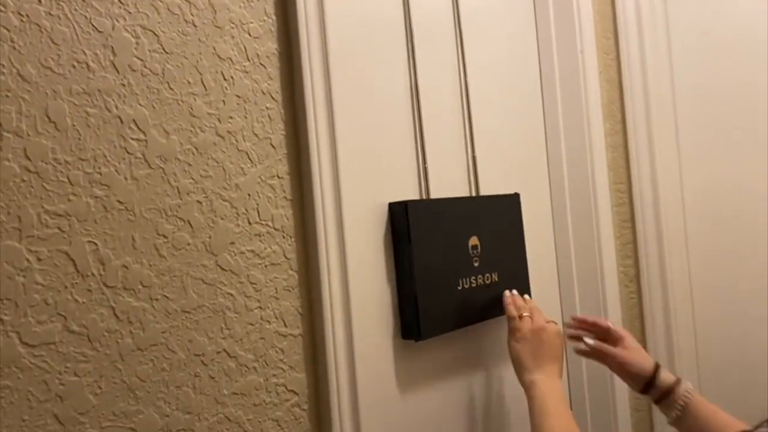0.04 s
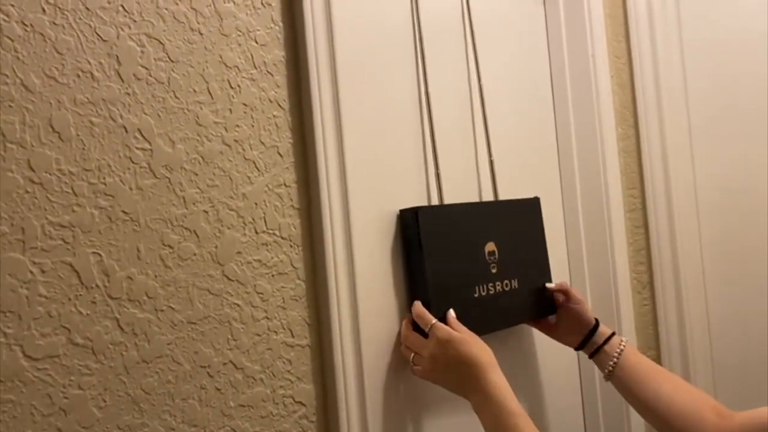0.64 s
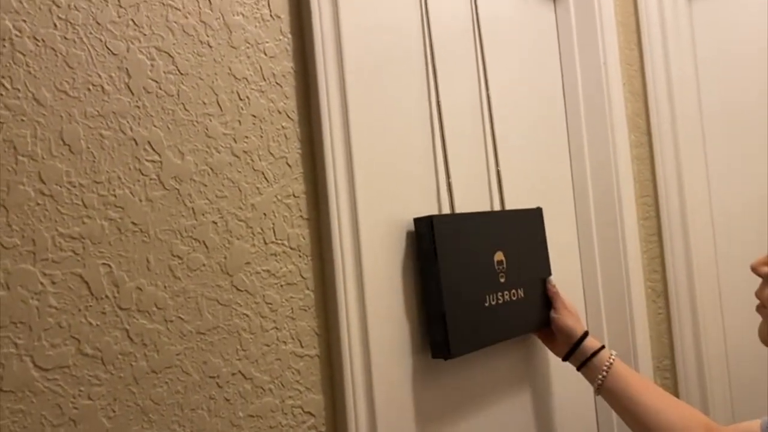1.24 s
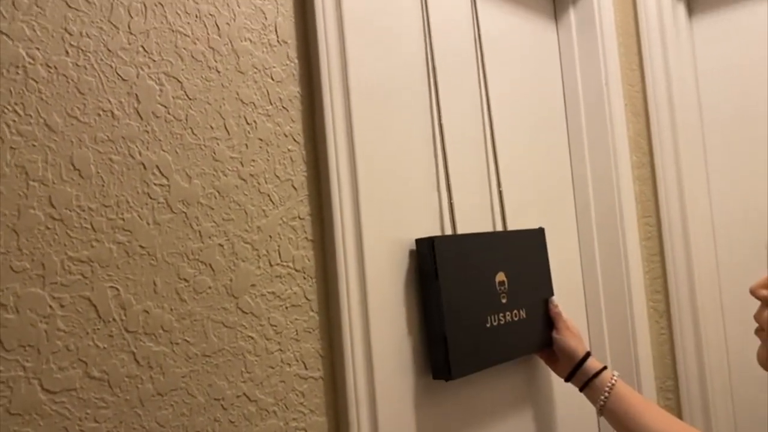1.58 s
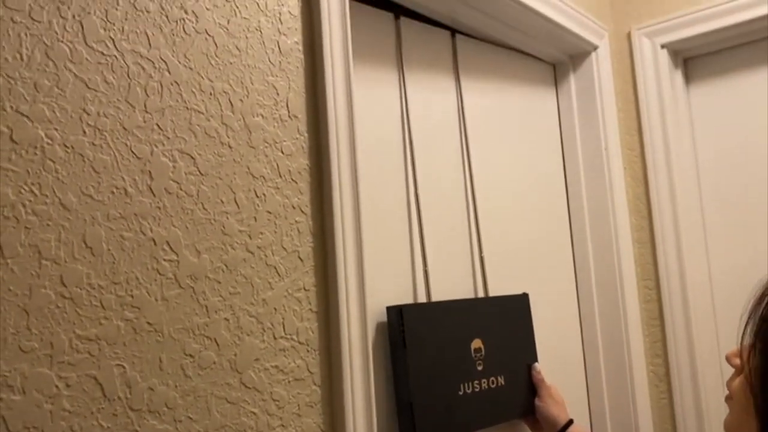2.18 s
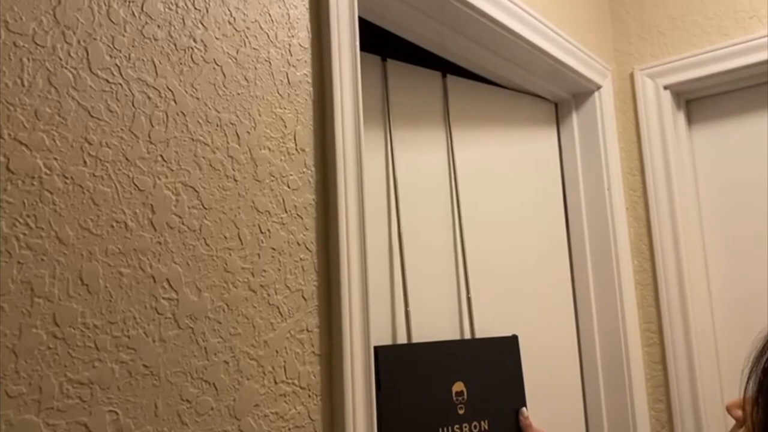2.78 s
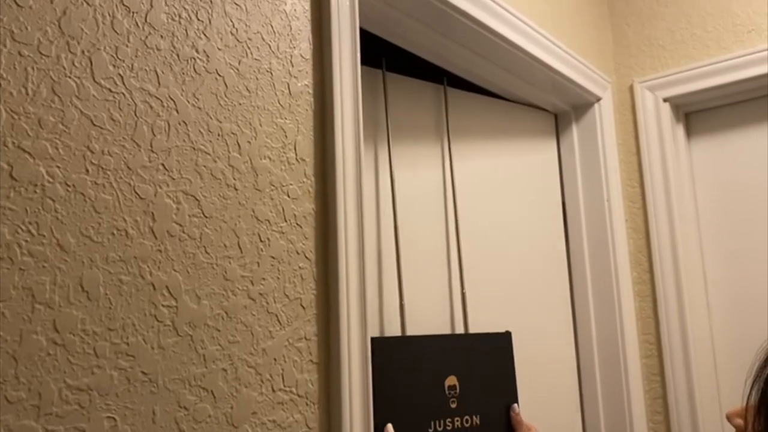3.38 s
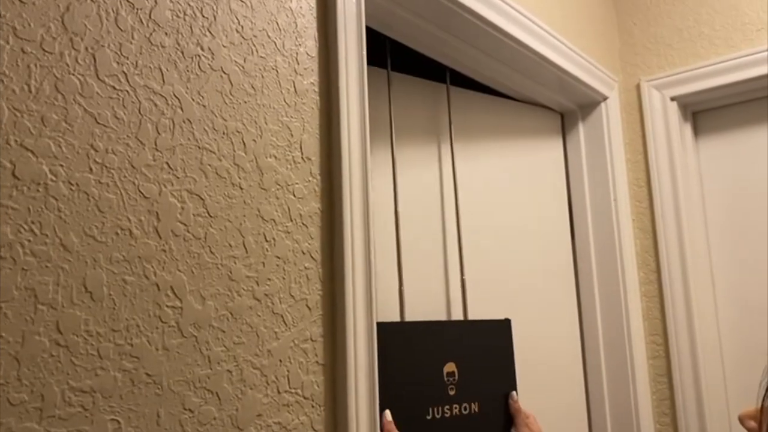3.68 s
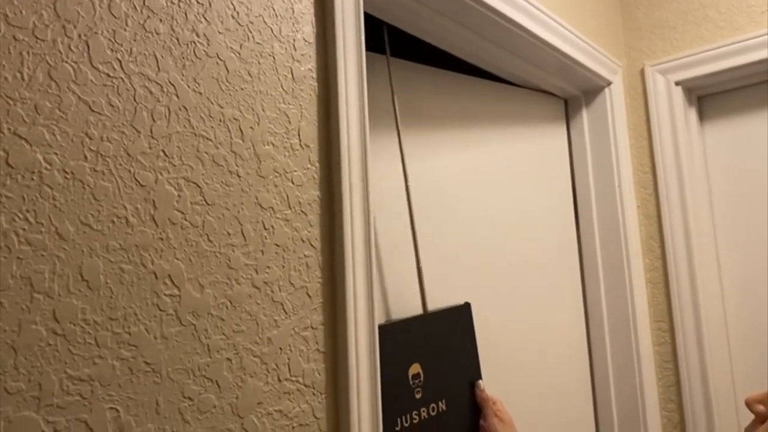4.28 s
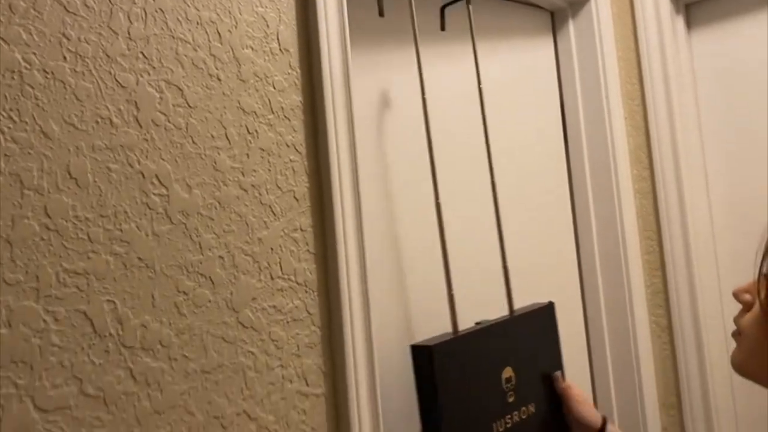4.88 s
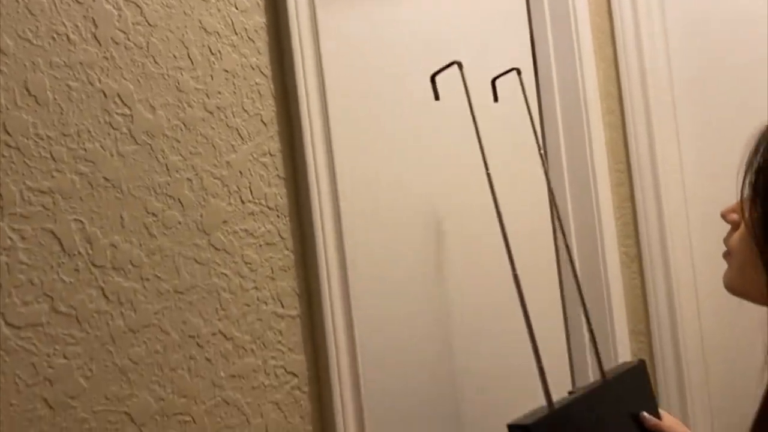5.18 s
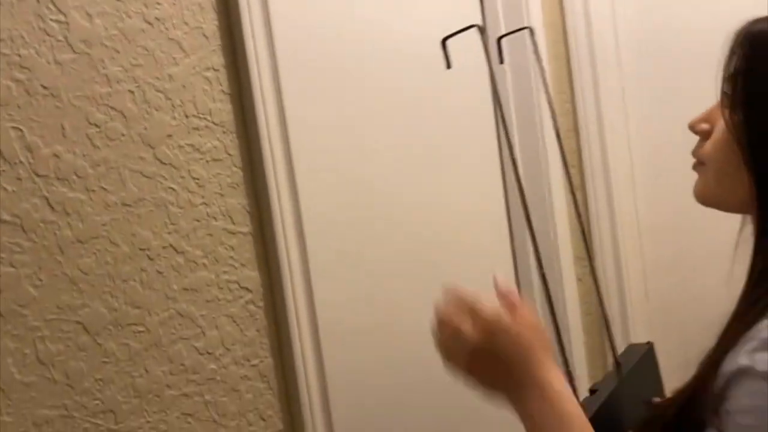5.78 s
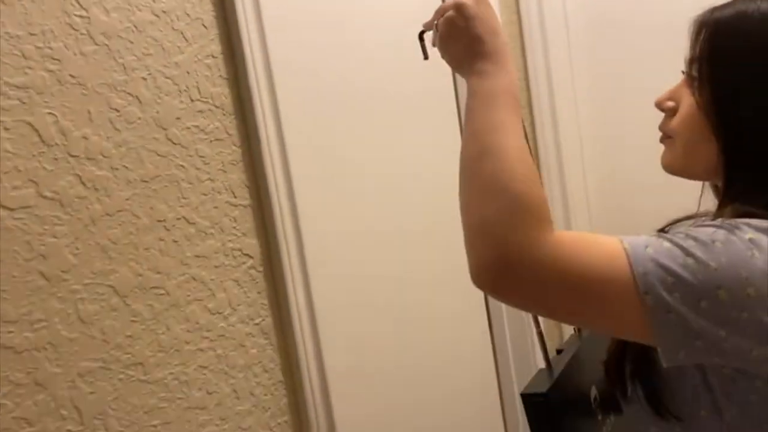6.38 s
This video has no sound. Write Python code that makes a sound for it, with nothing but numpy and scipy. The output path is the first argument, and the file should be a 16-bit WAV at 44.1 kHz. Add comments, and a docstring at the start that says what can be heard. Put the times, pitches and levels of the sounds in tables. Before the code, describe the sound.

A faint, low ventilation hum runs throughout in a narrow hallway with a short echo. From about 0.2 to 1.5 seconds, fingers and nails tap lightly on a folded mirror case, which chafes briefly against a door. At 1.6 seconds the door meets its latch with a deep thud and a crack, the loudest sound, and wire hooks buzz briefly. From 2.6 seconds the hooks clack against the wood, with low knocks, gritty scraping and two short groans around 3.2 and 3.4 seconds. The strongest rattles come at 3.6 and 4.2 seconds, each with a short metallic twang slightly to the left, and a smaller clack follows at 4.5. Around 5 seconds the wire skids with a thin hiss, then one dry click. The hollow case bumps softly several times until 6 seconds. A sleeve rustle grows toward 6.5 seconds, with two light taps.

```python
"""In a narrow hallway, a folded mirror hangs from a door by two long wire hooks.
Fingers tap its case, the door meets its latch with a thud, the hooks scrape and clack off its top edge,
and the mirror is carried away with soft bumps and a rustle. Ventilation hums faintly throughout.
Impacts excite damped modes of wood and wire and bursts of reverberant noise; sliding friction
gives sustained noise, coloured by the surfaces in contact."""
import sys
import numpy as np
from scipy import signal
from scipy.fft import rfft, irfft, next_fast_len
from scipy.io import wavfile
from scipy.ndimage import uniform_filter1d, map_coordinates

SR = 44100
rng = np.random.default_rng(int(sys.argv[2]) if len(sys.argv) > 2 else 0)


def digitize_waveform(pressure):
    """Quantize a signal to 16-bit integers and store it at the path in sys.argv[1].

    Rows of a 2-D input are taken as channels; values are limited to [-1, 1].
    """
    field = np.atleast_2d(pressure).T
    bounded = np.clip(field, -1, 1)
    quanta = np.round(bounded * 32767).astype(np.int16)
    wavfile.write(sys.argv[1], SR, quanta)


N = 292904
TIME_S, RING_S = np.arange(N) / SR, np.arange(SR // 2) / SR  # time axes of the scene and of one blow
LEAD_S = 0.03  # surfaces graze this long before they meet

def amp(db):
    """Amplitude ratio: tenfold for every 20 dB."""
    return 10 ** (np.asarray(db) / 20)

def unit(x):
    """Normalisation to rms 1."""
    return x / np.sqrt(np.mean(x ** 2) + 1e-20)

def along(points, hz):
    """Interpolation of (frequency_hz, value) points on a logarithmic frequency axis."""
    knots_hz, values = np.transpose(points)
    return np.interp(np.log(hz + 1), np.log(knots_hz + 1), values)

def wobble(rate_hz):
    """Slow random modulation: a spline through rate_hz knots a second."""
    knots = rng.standard_normal(int(N * rate_hz / SR) + 4)
    return map_coordinates(knots, [TIME_S * rate_hz])

def filtered(x, response):
    """Linear filtering: the spectrum is multiplied by a frequency response."""
    n = x.shape[-1]
    padded = next_fast_len(n + 8192)
    return irfft(rfft(x, padded) * response(np.fft.rfftfreq(padded, 1 / SR)), padded)[..., :n]

def add(track, start_s, sound):
    """Superposition: a sound sums into the track from start_s on."""
    part = track[..., round(start_s * SR):][..., :sound.shape[-1]]
    part += sound[..., :part.shape[-1]]

# Likeness of left and right: frequency_hz, coherence_ratio
COHERENCE = [(60, 0.91), (150, 0.81), (280, 0.75), (500, 0.62), (900, 0.13), (2000, 0.13), (4000, 0.48),
             (10000, 0.28)]
def diffuse(pair):
    """Diffuse field: two independent signals mix into partly coherent left and right channels."""
    angle = lambda hz: np.arccos(np.clip(along(COHERENCE, hz), -1, 1)) / 2
    mid, side = filtered(pair, lambda hz: np.array([np.cos(angle(hz)), np.sin(angle(hz))]))
    return np.array([mid + side, mid - side])

def rush(spectrum, grain_db):
    """Amplitude modulation makes noise grainy; (frequency_hz, level_db) points colour it. Rms is 1."""
    grains = rng.standard_normal((2, N)) * amp(grain_db * wobble(250))
    return unit(filtered(diffuse(grains), lambda hz: amp(along(spectrum, hz))))

def resonances(peaks, hz):
    """Resonance: each peak adds a Lorentzian curve to the frequency response."""
    return sum(amp(db) / (1 + (2 * (hz - centre_hz) / width_hz) ** 2) for centre_hz, width_hz, db in peaks)

def crowded_modes(hz, spacing_hz, depth_db):
    """Modal selection: each contact point favours a few of many short-lived resonances."""
    ripple = map_coordinates(rng.standard_normal(512), [hz / spacing_hz], mode="mirror")
    return amp(depth_db * np.minimum(ripple, 1))  # damping caps the peaks; the gaps stay deep

def ring(modes, scatter_db):
    """Free vibration: modes decay exponentially, with random phase and level scatter at each ear."""
    hz, db, t60_s = np.transpose(modes)[:, :, None]
    strength = amp(rng.normal(0, scatter_db, (2, len(modes))))
    phase = rng.uniform(0, 2 * np.pi, strength.shape)
    fade = amp(db - 60 * RING_S / t60_s) * (1 - np.exp(-RING_S / 0.0041))
    angle = 2 * np.pi * hz * RING_S
    sines, cosines = fade * np.sin(angle), fade * np.cos(angle)
    return (strength * np.cos(phase)) @ sines + (strength * np.sin(phase)) @ cosines

# Reverberation time of the hallway: frequency_hz, t60_s
HALL_DECAY = [(200, 0.42), (800, 0.32), (2500, 0.25), (6000, 0.21), (11000, 0.066)]
def impact(rise_s, early_t60_s, tail_db):
    """Reverberation: close walls thicken a blow into a noise burst; its tail dies treble first."""
    hz, frame_s, spectra = signal.stft(rng.standard_normal((2, len(RING_S))), SR, nperseg=256)
    decay = amp(-60 * np.maximum(frame_s - LEAD_S, 0) / along(HALL_DECAY, hz)[:, None])
    tail = signal.istft(spectra * decay, SR, nperseg=256)[1][:, :len(RING_S)]
    age_s = RING_S - LEAD_S - rise_s
    onset = 1 + np.tanh(age_s / max(rise_s, 0.0005) / 2)
    early = rng.laplace(size=tail.shape) * amp(-60 * np.maximum(age_s, 0) / early_t60_s)
    return onset * (early + amp(tail_db) * tail)

def softness_db(hz, hardness_hz):
    """Contact compliance: a blow excites little above its hardness frequency."""
    return -10 * np.log10(1 + (hz / hardness_hz) ** 4)

def strike(blow, spectrum, weight_db, hardness_hz, knock_db, ripple_db):
    """Impact spectrum: weight sets the thump and knock, hardness the tick, relative to the bright band."""
    colour = lambda hz: amp(along(spectrum, hz)) * crowded_modes(hz, spacing_hz=69.36, depth_db=ripple_db)
    sound = filtered(diffuse(blow), colour)
    bands = [(220, 600, weight_db),  # thump
             (600, 1300, knock_db + 0.93 * weight_db),  # knock
             (1300, 3500, 0),  # bright band
             (3500, 13000, softness_db(5930, hardness_hz))]  # tick
    out = 0
    for low_hz, high_hz, db in bands:
        band = filtered(sound, lambda hz: 1 / (1 + (hz / high_hz) ** 8) - 1 / (1 + (hz / low_hz) ** 8))
        power = uniform_filter1d(np.mean(band ** 2, axis=0), size=768)
        out = out + amp(db) * band / np.sqrt(power.max())
    return out

def held(strokes, attack_s, release_t60_s):
    """Incoherent addition: stroke envelopes build, hold and decay, and their powers sum."""
    power = np.zeros(N)
    for start_s, length_s, db in strokes:
        t = np.arange(int((length_s + release_t60_s) * SR)) / SR
        build_s = attack_s + 0.063 * length_s  # long strokes build more slowly
        attack = np.sin(np.pi / 2 * np.minimum(t / build_s, 1)) ** 2
        level = amp(db - 60 * np.maximum(t - length_s, 0) / release_t60_s)
        add(power, start_s, (attack * level) ** 2)
    return np.sqrt(power)

# Moving air: frequency_hz, level_db
AIR_SPECTRUM = [(20, -29), (38, -1), (60, -1), (88, -12.5), (125, 2), (160, -14), (240, -16), (400, -25),
                (660, -37.5), (1200, -45.5), (3000, -57.5), (11900, -67.5)]
# Ventilation resonances: pitch_hz, width_hz, level_db
VENT_HUMS = [(52.04, 6.1, -53), (123.1, 9, -59), (226.6, 21, -69)]
def ventilation(air_db):
    """Narrow-band noise: resonances waver as hums over a dull rush of air; both swell once."""
    hum = np.zeros(N)
    for hz, width_hz, db in VENT_HUMS:
        phase = 2 * np.pi * hz * TIME_S
        hum += amp(db) * (wobble(2 * width_hz) * np.cos(phase) + wobble(2 * width_hz) * np.sin(phase))
    swell_db, crest_s, half_width_s = 2.5, 6.27, 0.74
    swell = amp(swell_db * np.exp(-((TIME_S - crest_s) / half_width_s) ** 2))
    return swell * (hum + amp(air_db) * rush(AIR_SPECTRUM, grain_db=1.5))

# Fingers and nails on the case: start_s, level_db, weight_db, hardness_hz
FINGER_TAPS = [(0.226, -57.5, 9, 3920), (0.287, -60.5, 4, 4200), (0.304, -61.5, 11.5, 3700),
               (0.336, -55, 0.5, 4700), (0.391, -62.5, 4, 4230), (0.46, -62, 3, 4700),
               (0.524, -73, 17.5, 3000), (0.617, -55, -18, 2860), (0.647, -50, -9, 3000),
               (0.701, -65.5, 9, 1490), (0.787, -74, 5, 3200), (0.875, -72.5, 5.5, 3000),
               (1.267, -60, -10, 6540), (1.426, -54, -4.5, 2420), (2.057, -73, -8, 1600),
               (2.47, -63.5, -2.5, 2500), (2.556, -64, 11.5, 2000), (6.165, -57, -5, 2680),
               (6.431, -52.5, -11, 5600)]
# The tapped case: frequency_hz, level_db
TAP_SPECTRUM = [(250, -4), (500, -9), (1000, -3), (1800, -10), (3000, -14.5), (5000, -8), (7500, -7.5),
                (11500, -13.5)]
def finger_taps(gain_db):
    """Impulsive excitation: light contacts on the case give short, dry taps."""
    out = np.zeros((2, N))
    for start_s, db, weight_db, hardness_hz in FINGER_TAPS:
        blow = impact(rise_s=0.0039, early_t60_s=0.074, tail_db=-7)
        tap = strike(blow, TAP_SPECTRUM, weight_db, hardness_hz, knock_db=-5, ripple_db=5.5)
        add(out, start_s - LEAD_S, amp(db + gain_db) * tap)
    return out

# Blows that reach the wood: start_s, level_db
DOOR_KNOCKS = [(0.228, -47), (0.304, -54), (0.335, -46.5), (1.572, -28), (3.137, -41), (3.178, -42),
               (3.54, -42), (3.586, -38), (4.094, -48), (4.267, -45), (4.541, -43.5), (4.568, -49)]
# Upper modes of the door: pitch_hz, level_db, t60_s
KNOCK_MODES = [(224.3, 0.5, 0.15), (362, -6, 0.14), (441, -4, 0.1), (507, -10, 0.1)]
def door_knocks(gain_db):
    """Damped resonance: the hollow door answers a firm blow with a short, low knock."""
    out = np.zeros((2, N))
    for start_s, db in DOOR_KNOCKS:
        add(out, start_s, amp(db + gain_db) * diffuse(ring(KNOCK_MODES, scatter_db=0)))
    return out

# Strokes of the sleeve and sliding fingers: start_s, length_s, level_db
SLEEVE_STROKES = [(0.27, 0.078, -77), (0.5, 0.074, -75), (2.29, 0.075, -74.5), (2.47, 0.039, -78.5),
                  (4.695, 0.018, -75.5), (4.78, 0.038, -74), (4.87, 0.043, -71), (4.93, 0.5, -75),
                  (5.45, 0.17, -75.5), (5.565, 0.028, -70.5), (5.63, 0.2, -78), (5.82, 0.56, -71.5),
                  (6.02, 0.11, -69), (6.17, 0.057, -69), (6.405, 0.063, -56.5), (6.49, 0.12, -62),
                  (6.54, 0.033, -58.5)]
# Sliding cloth: frequency_hz, level_db
CLOTH_SPECTRUM = [(150, -28), (400, -2), (1000, 3), (1400, -5.5), (2200, -5.5), (4500, -12), (7500, -12.5),
                  (11500, -18.5)]
def sleeve_rustle(gain_db):
    """Friction noise: cloth and skin slide in grainy strokes that flutter as folds catch."""
    flutter_db = 1.6 * wobble(28)
    envelope = held(SLEEVE_STROKES, attack_s=0.017, release_t60_s=0.31)
    return amp(gain_db + flutter_db) * envelope * rush(CLOTH_SPECTRUM, grain_db=1)

# The case rubs along the door: start_s, length_s, level_db
CASE_RUBS = [(0.55, 0.04, -67.5), (0.942, 0.019, -63.5), (0.989, 0.035, -58), (1.465, 0.12, -69)]
def case_rub():
    """Sliding friction: the case drags on the paint with a narrow, hollow chafe."""
    spectrum = [(400, -8), (800, -4), (1100, -0.5), (1650, -5), (2000, -13), (2700, -25),
                (4000, -40), (8000, -42)]
    return held(CASE_RUBS, attack_s=0.0085, release_t60_s=0.15) * rush(spectrum, grain_db=0)

# Jolts of the door panel: start_s, level_db
DOOR_THUDS = [(1.572, -15.5), (3.14, -36), (3.539, -32), (3.57, -36), (4.025, -40.5), (5.718, -37.5),
              (6.109, -39)]
# Lowest modes of the panel: pitch_hz, level_db, t60_s
PANEL_MODES = [(36, 7.5, 0.076), (65.4, 1.5, 0.13), (123, -1.5, 0.13), (172, 5, 0.055), (232.2, -7, 0.12)]
def door_thuds(rise_s):
    """Plate vibration: the jolted panel booms in its lowest modes."""
    boom = sum(amp(db - 60 * RING_S / t60_s) * np.sin(2 * np.pi * hz * RING_S)
               for hz, db, t60_s in PANEL_MODES)
    boom *= 1 - np.exp(-RING_S / rise_s)
    out = np.zeros(N)
    for start_s, db in DOOR_THUDS:
        add(out, start_s, amp(db) * boom)
    return out

# The door meets its latch: start_s, level_db, weight_db, hardness_hz
LATCH_BLOWS = [(1.572, -32.5, -6, 4600)]
# Latch and frame: frequency_hz, level_db
LATCH_SPECTRUM = [(200, 2), (320, -3), (430, 8), (560, -3), (1000, -1), (1500, -1), (2800, -1.5),
                  (4000, -7), (5500, -14), (7500, -12.5), (11500, -25)]
def latch_crack(gain_db):
    """Modal overlap: latch and frame ring with so many modes at once that none stands out."""
    out = np.zeros((2, N))
    for start_s, db, weight_db, hardness_hz in LATCH_BLOWS:
        blow = impact(rise_s=0.003, early_t60_s=0.1, tail_db=-15)
        crack = strike(blow, LATCH_SPECTRUM, weight_db, hardness_hz, knock_db=0.5, ripple_db=2)
        add(out, start_s - LEAD_S, amp(db + gain_db) * crack)
    return out

# The hooks shiver after the thud: start_s, length_s, level_db
HOOK_SHIVERS = [(1.61, 0.091, -66)]
def hook_shiver():
    """Contact chatter: the wires buzz noisily against the door as it comes to rest."""
    spectrum = [(400, -1), (1000, 3.5), (1700, -1.5), (3800, -8), (5000, -26), (8000, -12), (11500, -51)]
    return held(HOOK_SHIVERS, attack_s=0.034, release_t60_s=0.17) * rush(spectrum, grain_db=-0.5)

# Hooks hit the door and its frame: start_s, level_db, weight_db, hardness_hz
HOOK_CLACKS = [(2.601, -41, -8, 3300), (2.623, -40.5, -5.5, 3400), (2.916, -52, 3, 3970),
               (2.944, -42.5, -4.5, 3680), (3.136, -41, 7.5, 3300), (3.178, -49, -0.5, 2100),
               (3.531, -52.5, 9.5, 2820), (3.547, -51.5, 12.5, 2000), (3.562, -36.5, 2, 7500),
               (3.576, -30.5, -6.5, 4400), (3.597, -44.5, 1, 5200), (3.652, -47, 2.5, 1700),
               (3.774, -61, 1.5, 1600), (3.921, -57.5, 4, 5500), (4.02, -38.5, -7.5, 2980),
               (4.093, -47.5, 0, 2570), (4.211, -43, 1, 5400), (4.226, -41.5, -0.5, 4800),
               (4.238, -27, -6, 3900), (4.389, -58, 8, 1000), (4.539, -39.5, -1.5, 2300),
               (4.558, -50, 3, 2320)]
# Wire on wood: frequency_hz, level_db
CLACK_SPECTRUM = [(150, -5), (230, 8.5), (330, 10), (480, 6.5), (850, 2), (1150, -2), (1500, -8.5),
                  (2700, -12.5), (4000, -16.5), (5500, -20), (7300, -21.5), (11500, -31)]
def hook_clacks(gain_db):
    """Hard impact: wire rattles on wood in brief broadband bursts."""
    out = np.zeros((2, N))
    for start_s, db, weight_db, hardness_hz in HOOK_CLACKS:
        blow = impact(rise_s=0.0027, early_t60_s=0.097, tail_db=-10.5)
        clack = strike(blow, CLACK_SPECTRUM, weight_db, hardness_hz, knock_db=2, ripple_db=5)
        add(out, start_s - LEAD_S, amp(db + gain_db) * clack)
    return out

# Modes of each hook: pitch_hz, level_db, t60_s
FIRST_HOOK_MODES = [(530, -13, .15), (740, -7, .21), (791, -4, .14), (860, -3, .17), (1026, -8, .15),
                    (1325, -10, .24), (1477, -8, .18), (1603, -15, .18), (1875, -15, .16), (2379, -19, .14),
                    (2904, -15, .13), (4119, -12, .12), (5046, -9, .07), (5921, -12, .07)]
SECOND_HOOK_MODES = [(651, 0, .11), (867, -7, .11), (944, -3, .1), (1190, -9, .12), (2057, -11, .13),
                     (2241, -9, .14), (2719, -4, .14), (3079, -9, .14), (3601, -9, .12), (4672, -14, .12),
                     (5122, -14, .11), (5850, -15, .1), (7450, -19, .09)]
# A hook strikes the door and rings: start_s, hook_name, level_db, hardness_hz
HOOK_STRIKES = [(3.529, "second", -36.5, 700), (3.531, "first", -42, 1000), (3.546, "first", -32, 1200),
                (3.566, "first", -31, 5500), (4.239, "second", -34.5, 4500), (4.54, "second", -48, 5000)]
def hook_twangs(hook, modes, ring_db, weight_share, left_db):
    """Natural modes: a hook rings faintly at clacks, more at heavy ones, and strongly when it is struck itself."""
    plucks = [(start_s, db + ring_db + weight_share * weight_db, hardness_hz)
              for start_s, db, weight_db, hardness_hz in HOOK_CLACKS]
    plucks += [(start_s, db, hardness_hz) for start_s, name, db, hardness_hz in HOOK_STRIKES if name == hook]
    out = np.zeros((2, N))
    for start_s, db, hardness_hz in plucks:
        excited = [(hz, mode_db + softness_db(hz, hardness_hz), t60_s) for hz, mode_db, t60_s in modes]
        add(out, start_s, amp(db) * ring(excited, scatter_db=1))
    return out * amp([[left_db], [-left_db]])

# The wire sticks and slips: start_s, length_s, level_db
WIRE_JUDDERS = [(3.163, 0.014, -41), (3.368, 0.034, -40.5)]
# The wire drags over the door's edge: start_s, length_s, level_db
WIRE_DRAGS = [(3.29, 0.4, -62), (3.62, 0.1, -61.5), (3.895, 0.217, -58.5), (4.02, 0.088, -53.5)]
def hook_scrape(grit_db, slip_hz):
    """Stick-slip friction: dragged wire hisses in grains and, where it sticks, judders in a low groan."""
    spectrum = [(150, -25), (400, 4), (900, 1.5), (1500, -7), (2500, -16), (5000, -34.5), (11000, -36.5)]
    grit = rush(spectrum, grain_db=0.8)
    grit = unit(filtered(grit, lambda hz: crowded_modes(hz, spacing_hz=70, depth_db=2)))
    phase = 2 * np.pi * np.cumsum(slip_hz * (1 + 0.028 * wobble(60))) / SR
    tone = np.sin(phase) + amp(-26) * np.sin(2 * phase)
    groan = held(WIRE_JUDDERS, attack_s=0.025, release_t60_s=0.19) * tone
    return amp(grit_db) * held(WIRE_DRAGS, attack_s=0.066, release_t60_s=0.18) * grit + groan

# Bare wire skids on paint: start_s, length_s, level_db
WIRE_SKIDS = [(3.882, 0.11, -68), (4.015, 0.035, -56.5), (4.912, 0.021, -58.5), (4.979, 0.023, -58),
              (5.044, 0.03, -58), (5.072, 0.025, -55)]
# Resonances of the skidding wire: pitch_hz, width_hz, level_db
WIRE_RESONANCES = [(1630, 73, -3.5), (1910, 57, -0.5), (2567, 51, -1), (2870, 29, -2), (3700, 46, -12)]
def hook_skid(whine_db):
    """Forced vibration: a hook slides along the door's top with a fine hiss that sets the wire singing."""
    spectrum = [(700, 4), (1500, 8), (2600, 5), (4500, -3.5), (7500, -9.5), (11500, -13)]
    hiss = rush(spectrum, grain_db=1)
    hiss = unit(filtered(hiss, lambda hz: crowded_modes(hz, spacing_hz=93.8, depth_db=5)))
    drive = diffuse(rng.standard_normal((2, N)))
    whine = unit(filtered(drive, lambda hz: resonances(WIRE_RESONANCES, hz)))
    return held(WIRE_SKIDS, attack_s=0.004, release_t60_s=0.19) * unit(hiss + amp(whine_db) * whine)

# The case rocks in the hand: start_s, level_db
CASE_BUMPS = [(4.777, -55.5), (5.332, -52.5), (5.525, -57), (5.625, -50), (5.775, -59), (5.875, -49),
              (5.915, -55.5), (5.943, -55)]
# The hollow case: pitch_hz, width_hz, level_db
CASE_RESONANCES = [(442, 107, 2.5), (732, 106, -1), (1100, 1370, -18)]
def case_bumps(gain_db):
    """Cavity resonance: soft contacts sound only the hollow of the case."""
    out = np.zeros((2, N))
    for start_s, db in CASE_BUMPS:
        blow = diffuse(impact(rise_s=0.004, early_t60_s=0.095, tail_db=-9))
        bump = filtered(blow, lambda hz: resonances(CASE_RESONANCES, hz))
        add(out, start_s - LEAD_S, amp(db + gain_db) * bump / np.abs(bump).max())
    return out

def tick(start_s, level_db):
    """An impulse: one thin, dry click with no ring."""
    out = np.zeros(N)
    add(out, start_s, amp(level_db) * np.ones(2))
    return out

def scene():
    """Interaural level difference: handling is ahead, twangs lean left, thuds and ventilation right."""
    twangs = hook_twangs("first", FIRST_HOOK_MODES, ring_db=-20, weight_share=1.1, left_db=3)
    twangs += hook_twangs("second", SECOND_HOOK_MODES, ring_db=-29, weight_share=0.61, left_db=6)
    blows = hook_clacks(gain_db=-9.5) + latch_crack(gain_db=-9) + door_knocks(gain_db=-2.5)
    blows += finger_taps(gain_db=-6.5) + case_bumps(gain_db=7.5) + tick(start_s=5.249, level_db=-44.5)
    friction = hook_scrape(grit_db=1.5, slip_hz=277) + hook_skid(whine_db=-4.5)
    friction += case_rub() + hook_shiver() + sleeve_rustle(gain_db=2)
    low = door_thuds(rise_s=0.0058) + ventilation(air_db=-49.5)
    return twangs + blows + friction + low * amp([[-0.9], [0.9]])

def record(dry):
    """Band limiting: the deepest rumble and highest treble are cut, with a notch near 9 kHz."""
    bottom_hz, top_hz = 35, 11800
    notch_hz, notch_width_hz, notch_db = 9024, 685, -26
    thinned = signal.sosfilt(signal.butter(4, bottom_hz, "highpass", fs=SR, output="sos"), dry)
    notch = lambda hz: amp(notch_db * np.exp(-((hz - notch_hz) / notch_width_hz) ** 2))
    lowpass = lambda hz: 1 / (1 + (hz / top_hz) ** 160)
    return filtered(thinned, lambda hz: notch(hz) * lowpass(hz))

dry = scene()
out = record(dry)
digitize_waveform(out)
```